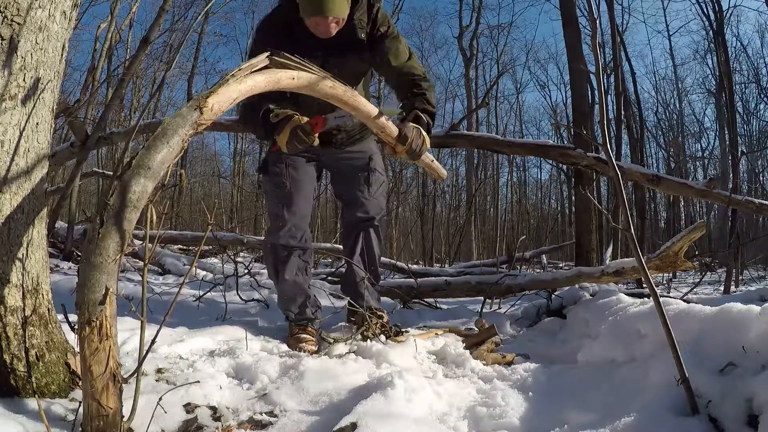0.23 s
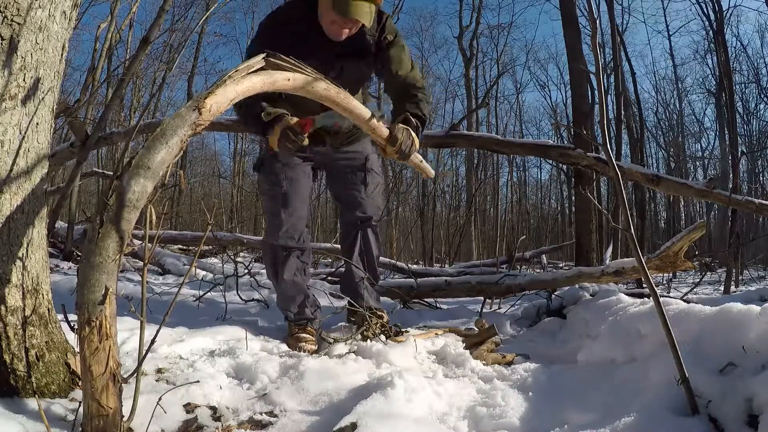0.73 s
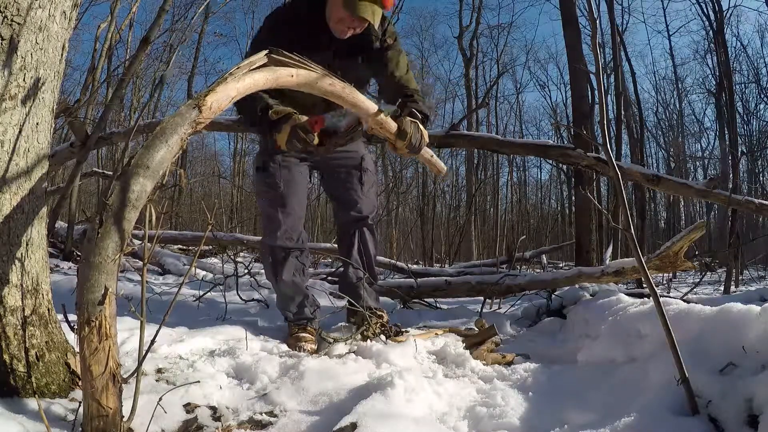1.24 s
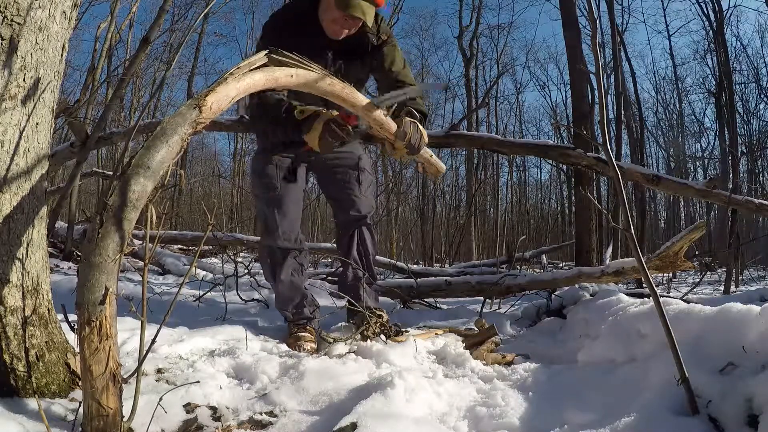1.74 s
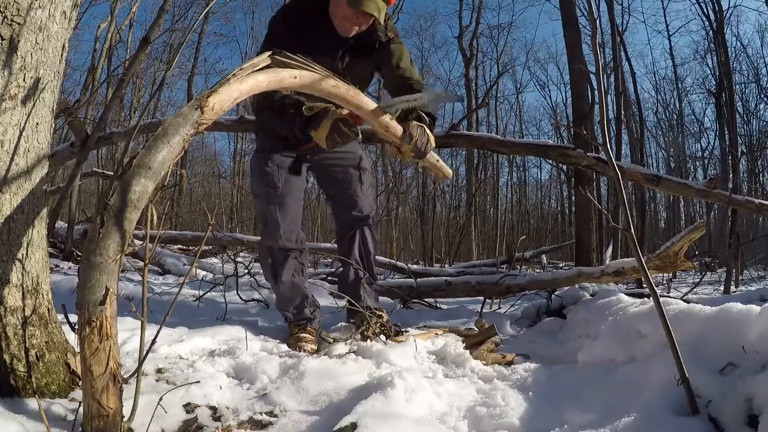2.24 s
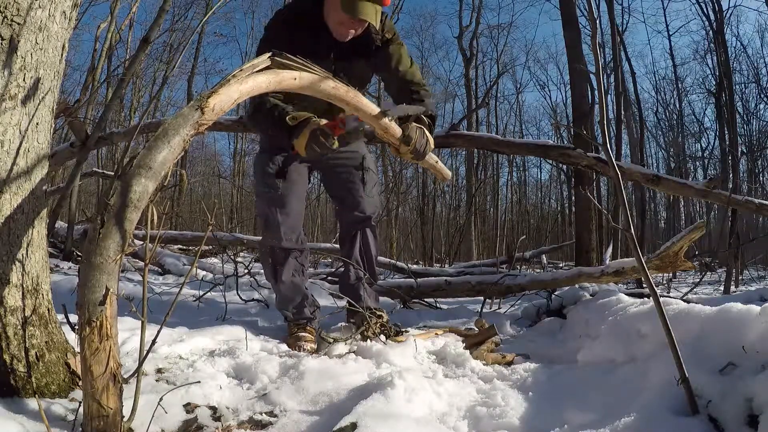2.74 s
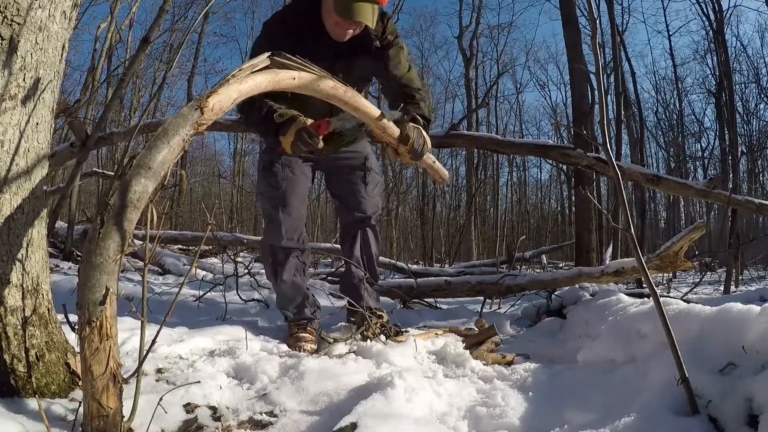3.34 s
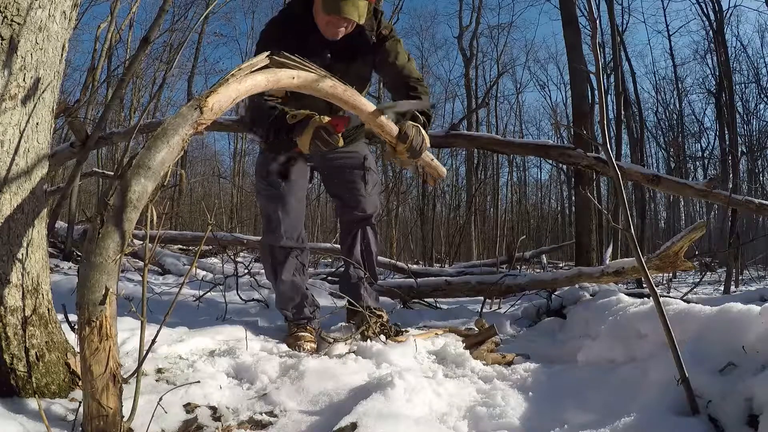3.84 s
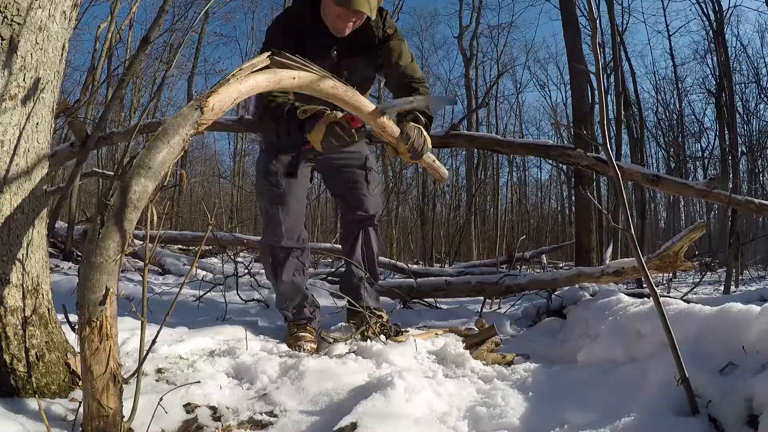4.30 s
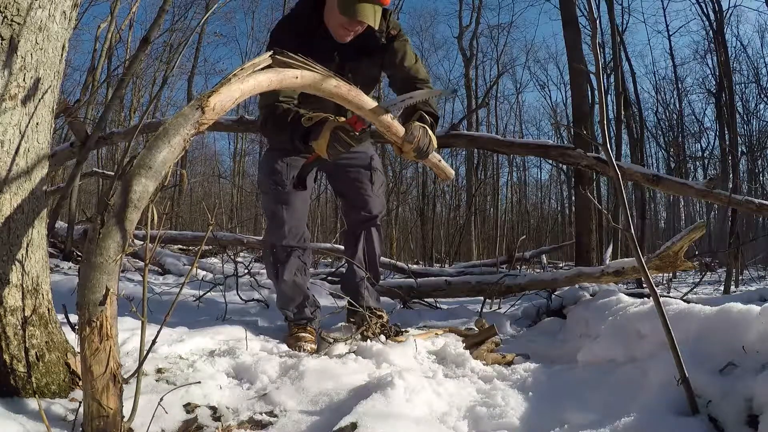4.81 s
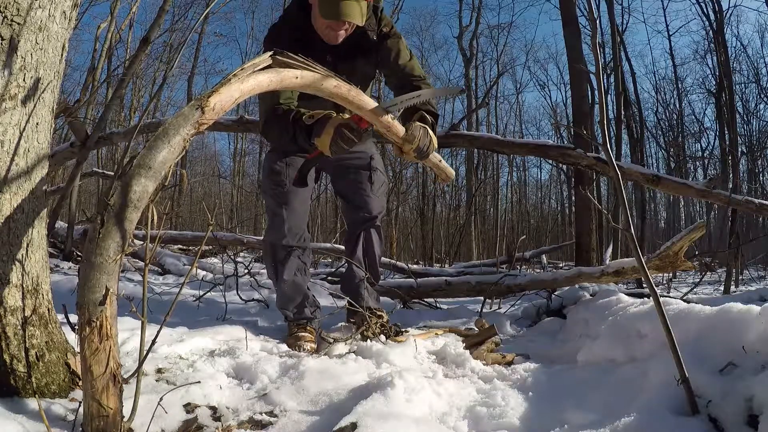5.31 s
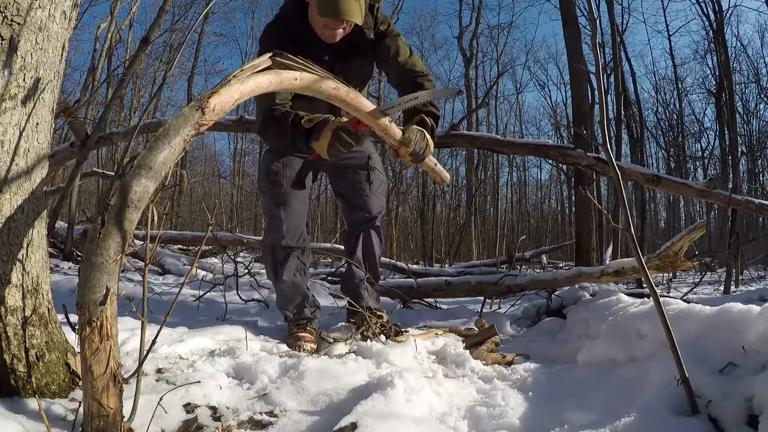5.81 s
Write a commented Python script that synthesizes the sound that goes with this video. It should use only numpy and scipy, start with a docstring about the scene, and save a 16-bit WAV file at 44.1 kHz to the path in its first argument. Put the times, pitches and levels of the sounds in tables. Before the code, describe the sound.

A hand saw cuts a dead branch throughout the six seconds, in quick, even strokes, a little over two back-and-forth cycles a second. Each pull is a dry, biting rasp that makes the branch judder; each push is lighter and duller, with a slight growl. Teeth snag with sharp clicks, strongest near 0.6, 1.5, 2.3, 3.6 and 4 seconds. The branch knocks dully around 1.9, 3.6, 4.5 and 5 seconds. The blade pings briefly near 1.9 and 2.3 seconds, and thin, short squeaks come now and then, mostly between 5 and 6 seconds. Several tiny digital glitches freeze the rasp into held tones for an instant, for example near 0.4, 2.1 and 4.5 seconds. The surrounding woods are quiet, with a faint steady hush and a thin echo from the trunks. Light air rumbles on the microphone, easing after about 5 seconds.

```python
"""A pruning saw rasps through a dead branch in quick, even strokes, in quiet winter woods.
On each pull the teeth bite and the branch judders; on each push they skate back, duller and lighter.
Teeth snag and tear free, the branch knocks, and now and then the blade squeaks or pings.
Brief digital glitches freeze the rasp into a few held tones.
Behind it, tree trunks give a faint echo and light air rumbles on the microphone."""
import sys
import numpy as np
from scipy import signal
from scipy.fft import rfft, irfft, next_fast_len
from scipy.io import wavfile
from scipy.ndimage import uniform_filter1d, map_coordinates

SR = 44100
rng = np.random.default_rng(int(sys.argv[2]) if len(sys.argv) > 2 else 0)


def transcribe(signal):
    """Save signal, clipped to [-1, 1], as a 16-bit WAV file at the path in sys.argv[1]."""
    frames = np.atleast_2d(signal).T
    limited = np.clip(frames, -1, 1)
    pcm = np.round(limited * 32767).astype(np.int16)
    wavfile.write(sys.argv[1], SR, pcm)


N = 267246

# A stroke has four parts: the teeth bite, the blade scrapes, the fibres hiss, the branch knocks.
# One row a push: start_s, length_s, hardest_moment (0-1), bite_db, scrape_db, hiss_db, knock_db,
# landing_db (extra pressure as the teeth land). Scrape, hiss and knock are added to bite_db.
PUSH_STROKES = [(-0.098, 0.1561, 0.33, -29.5, 1.5, -5, -10.5, 3.0),
                (0.325, 0.1829, 0.59, -33.5, -4.5, -7.5, -9, 8),
                (0.758, 0.16, 0.63, -31.5, -4, -8.0, -8.5, 11),
                (1.176, 0.16, 0.618, -31.0, -5.5, -9.5, -10, 11.5),
                (1.583, 0.17, 0.62, -33.5, -3.5, -5, -5.5, 8.5),
                (2.027, 0.13, 0.63, -31.5, -7.5, -8.0, -6.5, -1),
                (2.425, 0.17, 0.62, -33.0, -5.5, -7, -12, 5.5),
                (2.858, 0.15, 0.648, -32.5, -4.5, -6.0, -11, 4),
                (3.301, 0.17, 0.41, -33.5, -4, -6.5, -8.5, -8),
                (3.724, 0.17, 0.58, -33.5, -2.5, -6, -10, 9.5),
                (4.172, 0.16, 0.4926, -33, -3.5, -6, -16, -3),
                (4.605, 0.21, 0.59, -35.5, -3.5, -7.5, -8.5, 8),
                (5.103, 0.19, 0.393, -35, -2.5, -5.5, -9.5, -6.5),
                (5.545, 0.19, 0.6055, -34, -1, -4.5, -7.5, 7),
                (5.988, 0.1644, 0.653, -34.5, -1, -1.5, -5.5, 6.5)]
# One row a pull: the same columns, then judder_depth (0-1), judder_hz
PULL_STROKES = [(0.092, 0.1902, 0.5475, -28.5, -4, -7, -12, 0, 0.76, 77.66),
                (0.534, 0.17, 0.43, -28.0, -3.5, -4.0, -9.5, -6.5, 0.5, 78.0),
                (0.974, 0.17, 0.462, -27, -3.5, -3.5, -13.0, -13.5, 0.43, 74.8),
                (1.398, 0.14864, 0.435, -26.5, -5.5, -5, -11.5, -7.5, 0.25, 76.4),
                (1.776, 0.17, 0.674, -33.5, -0.5, -4.5, -8.0, 5.5, 0.75, 65.4),
                (2.216, 0.1673, 0.55, -26.5, -4.0, -5.5, -12, -7.5, 0.38, 76.44),
                (2.64, 0.16, 0.65, -30.5, -4.5, -5, -11.0, 5.5, 0.75, 74.8),
                (3.082, 0.1641, 0.59, -31.5, -1.5, -4.5, -9, 2.5, 0.68, 77.3),
                (3.504, 0.1694, 0.54, -29.0, -5.5, -3.5, -10, -4.5, 0.891, 69.9),
                (3.924, 0.1656, 0.7052, -30.5, -1.5, -2.5, -10, 9, 0.91, 74.2),
                (4.375, 0.16, 0.62, -31, -2.5, -3, -9.5, 0.5, 0.55, 78.0),
                (4.879, 0.15, 0.48, -29.5, -7, -4.5, -10, -5.5, 0.44, 75.6),
                (5.332, 0.18, 0.54, -31, -2.5, -2, -8.5, -3.5, 0.19, 79.1),
                (5.784, 0.16, 0.5236, -29, -4.5, -1, -9.5, -3.5, 0.31, 76.7)]
def sawing():
    """The saw goes back and forth; a caught tooth stalls the blade just before it tears free."""
    out, stall_db = np.zeros((2, N))
    for start_s, *shape, depth, judder_hz in PULL_STROKES:
        add(out, start_s, pull(shape, depth, judder_hz))
    for start_s, *shape in PUSH_STROKES:
        add(out, start_s, push(shape))
    for snag_s, _ in TOOTH_SNAGS:
        add(stall_db, snag_s - .008, 5 * np.hanning(440))
    return out * amp(-stall_db)


# How each part follows the arm's effort. Rows are bite, scrape, hiss, knock:
# steepness (a power of effort), lag (share of the stroke), landing_share (of landing_db)
PULL_RESPONSE = [(1.24, 0., 0.973), (1.36, 0.0019, 0.645), (1.73, -.01, 1), (0.71, .06, 1)]
# The tone of each part of a pull: pitch_hz, level_db
PULL_BITE_TONE = [(650, -77), (1100, -18), (1300, -6), (1410, 0.5), (1450, 1.5), (1740, -7.5),
                  (1870, -10.5), (2300, -19), (2990, -49), (5060, -120)]
PULL_SCRAPE_TONE = [(1350, -23.5), (2300, -9.5), (2450, -12.5), (2660, 1.5), (2820, 1), (3340, -2),
                    (3690, -8.5), (4010, -8), (4340, -9), (5360, -9), (5950, -20), (6200, -17.5),
                    (8060, -28), (13600, -120)]
PULL_HISS_TONE = [(3650, -34.5), (6200, -11), (8140, 0.5), (8590, -3.5), (9640, -13.5), (12900, -9),
                  (15500, -18.5)]
PULL_KNOCK_TONE = [(88, -12), (150, -23.5), (189, 0), (273, 0), (334, -1.5), (382, -19), (436, -5.5),
                   (533, -10), (822, -0.5), (1100, -7.5), (1430, -20), (2420, -120)]
def pull(shape, depth, judder_hz):
    """The cutting stroke: the branch bounces on the teeth, so they bite in bursts and it thrums."""
    speed, bite, scrape, hiss, knock = stroke(PULL_RESPONSE, *shape, land_at=.2134, land_spread=.24)
    force = teeth(speed, tooth_hz=680, jitter=.25, uneven_db=2.5, tear_s=.0008, rub=1., click=.5)
    steel = shifting_grip(force, depth_db=2.5, patch_hz=200.2, patch_s=.01445)
    swing = 2 * np.pi * np.cumsum(judder_hz * (1 + .06 * wobble(len(speed), 40))) / SR
    pressure = depth * np.cos(swing)
    cut = amp(-1.35) * bite * colour(force * amp(3.7 * pressure), PULL_BITE_TONE)
    blade = amp(-1.5) * scrape * colour(steel * amp(2.5 * pressure), PULL_SCRAPE_TONE)
    fibres = amp(.4) * hiss * colour(steel * amp(3.2 * pressure), PULL_HISS_TONE)
    branch = amp(-2.5) * knock * colour(force * amp(2 * pressure), PULL_KNOCK_TONE)
    sway = resonate(np.sin(swing), hz=80, width_hz=18)  # the branch's slowest sway
    thrum = amp(2) * depth * uniform_filter1d(knock, 900) * sway
    return cut + blade + fibres + branch + thrum


# Bite, scrape, hiss and knock on a push: steepness, lag, landing_share
PUSH_RESPONSE = [(1.14, 0.0158, 0.91), (1.67, -.02, 0.5), (1.52, -.04, .6), (0.64, .08, 1)]
# The tone of each part of a push, and of its growl: pitch_hz, level_db
PUSH_BITE_TONE = [(650, -24.5), (1100, -13), (1210, -2.5), (1450, 3), (1520, 2.5), (1630, -8.5),
                  (1930, -5.5), (2300, -19.5), (2990, -33.5), (5060, -120)]
PUSH_SCRAPE_TONE = [(1350, -38.5), (2300, -9), (2530, -14), (2830, 0.5), (3080, -10.5), (3340, -5.5),
                    (3830, -14), (4160, -9.5), (6200, -17), (8060, -25), (13600, -120)]
PUSH_HISS_TONE = [(3650, -29.5), (6200, -29.5), (6930, -4), (8270, 1), (9600, -12.5), (12900, -7.5),
                  (15500, -21.5)]
PUSH_KNOCK_TONE = [(90, -44), (135, -28), (172, 0), (235, -11.5), (335, 1.5), (410, 6), (500, -5.5),
                   (630, 4), (780, 2), (900, -8.5), (1100, -5.5), (1430, -48), (2400, -100)]
GROWL_TONE = [(90, -5.5), (170, 0), (250, 0.5), (350, 4), (480, -4.5), (680, 0.5), (900, -7.5), (1400, -22),
              (2400, -70)]
def push(shape, full_speed_bump_hz=190.25):
    """The return stroke: the backs of the teeth bump along in a growl that falls as the blade slows."""
    speed, bite, scrape, hiss, knock = stroke(PUSH_RESPONSE, *shape, land_at=.19, land_spread=.09)
    force = teeth(speed, tooth_hz=617, jitter=.3, uneven_db=2.5, tear_s=.0014, rub=.99, click=.5)
    steel = shifting_grip(force, depth_db=3, patch_hz=214, patch_s=.01756)
    cycles = np.cumsum(full_speed_bump_hz * speed * (1 + .025 * wobble(len(speed), 150))) / SR
    # the long branch passes each overtone of the bumps with its own strength and delay
    bumps = evened(sum(rng.uniform(.55, 1) * np.cos(2 * np.pi * (k * cycles + rng.random()))
                       for k in range(1, 12)))
    cut = amp(-.5) * bite * colour(force + .061 * bumps, PUSH_BITE_TONE)
    blade = amp(-.5) * scrape * colour(steel, PUSH_SCRAPE_TONE)
    fibres = amp(-1) * hiss * colour(force + .5 * steel, PUSH_HISS_TONE)
    swell = arch(np.linspace(0, 1, len(speed)), top=.74) ** 1.5
    growl = amp(1.5) * knock * swell * colour(bumps, GROWL_TONE)
    branch = amp(-6) * knock * colour(force, PUSH_KNOCK_TONE)
    sway = amp(-15) * knock * evened(resonate(force, hz=100, width_hz=25))
    return cut + blade + fibres + growl + branch + sway


def stroke(response, length_s, hardest, bite_db, scrape_db, hiss_db, knock_db, landing_db,
           land_at, land_spread):
    """One sweep of the arm: gives the blade's speed and the loudness of the four parts over time."""
    progress = np.linspace(0, 1, int(length_s * SR))
    top_speed = min(.16 / length_s, 1)  # only brisk strokes reach full speed
    speed = top_speed * (.5 + .5 * arch(progress, top=.58))
    pressure_db = landing_db * np.exp(-((progress - land_at) / land_spread) ** 2)
    level_db = bite_db + 2 * wobble(len(progress), 54.55)  # uneven wood makes the rasp waver
    gains = [amp(level_db + part_db + share * pressure_db) * arch(progress, hardest + lag) ** steepness
             for part_db, (steepness, lag, share) in zip((0, scrape_db, hiss_db, knock_db), response)]
    return speed, *gains


def teeth(speed, tooth_hz, jitter, uneven_db, tear_s, rub, click):
    """Each tooth snaps through fibres: a click and a short tearing burst, over steady rubbing."""
    count = len(speed)
    teeth_passed = np.cumsum(tooth_hz * speed * np.exp(jitter * wobble(count, 400))) / SR
    strength = amp(uneven_db * np.clip(rng.standard_normal(count), -2, 2))
    blows = strength * np.diff(np.floor(teeth_passed), prepend=0)
    tearing = evened(signal.lfilter([1], [1, -np.exp(-1 / (tear_s * SR))], blows))
    return evened((rub + tearing) * rng.standard_normal(count) + click * evened(blows))


def shifting_grip(force, depth_db, patch_hz, patch_s):
    """The grip on the blade keeps shifting, so narrow bands of pitch swell and fade."""
    hz, t, spectrum = signal.stft(force, SR, nperseg=512, noverlap=384)
    grid = np.meshgrid(hz / patch_hz, t / patch_s, indexing="ij")
    patches = evened(map_coordinates(rng.standard_normal((256, 64)), grid, order=1, mode="mirror"))
    gain = amp(depth_db * np.clip(patches, -2, 2))
    _, steel = signal.istft(spectrum * gain, SR, nperseg=512, noverlap=384)
    return evened(steel[:len(force)])


# Teeth catching on hard fibres: start_s, peak_db
TOOTH_SNAGS = [(.191, -17), (.204, -26.5), (.353, -32), (.55, -35), (.64, -13), (0.792, -32), (.859, -34.5),
               (1.195, -29), (1.464, -14.5), (1.487, -21), (1.612, -34), (1.833, -29), (1.864, -23),
               (1.878, -28), (1.895, -25), (2.083, -21), (2.275, -20), (2.32, -16.5), (2.7, -22),
               (2.889, -32.5), (3.139, -24), (3.538, -26), (3.568, -18), (3.585, -16.5), (3.598, -28.5),
               (3.636, -22), (3.976, -24.5), (4.002, -17), (4.643, -35), (4.915, -36), (4.956, -24),
               (5.82, -29)]
# The blade ticking in its slot as a stroke turns: start_s, peak_db
SLOT_TICKS = [(0.297, -44.5), (1.34, -67), (2.199, -45)]
# The notes of the wood at the cut: pitch_hz, width_hz, level_db
WOOD_NOTES = [(1502.3, 98, 10), (1647, 76, 2.5), (2910, 495, -3), (3920, 440, -33), (8550, 710, -22)]
def snags_and_ticks():
    """A caught tooth tears free and rings the wood; at the turns the blade only ticks."""
    out, t = np.zeros(N), np.arange(1200) / SR
    for start_s, peak_db in TOOTH_SNAGS:
        tear = burst(t, fade_s=.00159)
        snag = ring(tear, WOOD_NOTES) + .18 * colour(tear, PULL_HISS_TONE)
        add(out, start_s, amp(peak_db) * snag / abs(snag).max())
    for start_s, peak_db in SLOT_TICKS:
        tap = burst(t, fade_s=.00086)
        tick = colour(tap, PULL_HISS_TONE) + .58 * ring(tap, WOOD_NOTES)
        add(out, start_s, amp(peak_db) * tick / abs(tick).max())
    return out


# The branch jolting under a hard pull: start_s, peak_db
BRANCH_JOLTS = [(1.484, -40), (1.899, -31.5), (3.6, -34), (4.478, -32), (4.97, -32.5)]
# The low notes of the whole branch: pitch_hz, width_hz, level_db
BRANCH_NOTES = [(107.7, 17, -6.5), (189.3, 54, -3), (257, 38, -2.5)]
def jolts():
    """The whole branch gives a dull knock when the saw grabs it."""
    out, t = np.zeros(N), np.arange(SR // 6) / SR
    for start_s, peak_db in BRANCH_JOLTS:
        knock = ring(burst(t, fade_s=.001), BRANCH_NOTES)
        add(out, start_s, amp(peak_db) * knock / abs(knock).max())
    return out


# Sliding squeaks: start_s, length_s, start_hz, end_hz, level_db
TOOTH_SQUEAKS = [(1.643, 0.035, 4170, 3780, -42), (2.297, 0.059, 3970, 4130, -36),
                 (2.493, 0.03, 4350, 4000, -41.5), (2.756, 0.025, 3276, 3440, -41),
                 (3.195, .03, 4100, 4380, -48.5), (4.668, 0.056, 5990, 5800, -44),
                 (5.163, 0.026, 5700, 4670, -40), (5.152, 0.082, 3680, 3140, -36.5),
                 (5.404, .055, 7440, 8156, -29.5), (5.627, 0.048, 4745, 4100, -32.5),
                 (5.846, 0.0596, 8200, 7560, -33)]
def squeaks():
    """Steel teeth skate on the wood with a thin squeak that slides up or down."""
    out = np.zeros(N)
    for start_s, length_s, start_hz, end_hz, level_db in TOOTH_SQUEAKS:
        hz = np.linspace(start_hz, end_hz, int(length_s * SR))
        rubbing = rng.standard_normal(len(hz))
        squeak = resonate(resonate(rubbing, hz, width_hz=290), hz, width_hz=290)
        add(out, start_s, amp(level_db) * evened(squeak) * signal.windows.tukey(len(hz), .7))
    return out


# Pings late in a pull: start_s, pitch_hz, level_db, ring_s (time to fade by 60 dB)
BLADE_PINGS = [(.69, 3370, -56, 0.126), (1.931, 3922, -26, 0.041), (1.933, 7690, -27, .035),
               (2.324, 3227, -25, 0.071), (4.075, 2012, -41.5, 0.11)]
def pings():
    """The blade rings freely on one pure note that quickly dies away."""
    out, t = np.zeros(N), np.arange(SR // 6) / SR
    onset = 1 - np.exp(-t / .001)
    for start_s, pitch_hz, level_db, ring_s in BLADE_PINGS:
        add(out, start_s, amp(level_db - 60 * t / ring_s) * onset * np.sin(2 * np.pi * pitch_hz * t))
    return out


# Brief digital glitches: middle_s, length_s, level_db (compared with the rasp)
DIGITAL_GLITCHES = [(0.396, 0.037, -1), (1.673, 0.0305, -3), (2.1, 0.034, -2.5), (2.953, 0.0332, -2),
                    (3.589, 0.031, -2.5), (4.441, 0.033, -1.5), (4.488, 0.027, 1), (5.437, 0.029, 0.5)]
def glitches(rasp, tone_count=36):
    """A digital glitch freezes the strongest pitches into held tones while the hiss between drops."""
    out = rasp.copy()
    for middle_s, length_s, level_db in DIGITAL_GLITCHES:
        start_s = middle_s - length_s / 2
        t = np.arange(int(length_s * SR)) / SR
        part = rasp[round(start_s * SR):][:len(t)]
        hz = np.fft.rfftfreq(len(t), 1 / SR)
        strength = abs(rfft(part * np.hanning(len(t))))
        peaks = signal.find_peaks(strength, distance=5)[0]
        held = peaks[np.argsort(-strength[peaks] * hz[peaks] ** .25)[:tone_count]]  # favour high ones
        tones = strength[held] @ np.cos(2 * np.pi * (hz[held, None] * t + rng.random((tone_count, 1))))
        blend = signal.windows.tukey(len(t), .5) * np.pi / 2
        tones_in = amp(level_db) * part.std() * evened(tones) * np.sin(blend)
        rasp_out = .7 * part * (1 - np.cos(blend))
        add(out, start_s, tones_in - rasp_out)
    return out


def tree_echo(sound, fade_s=.207, echoes_per_s=1500):
    """Trunks scatter back a thin, dull echo; the snow swallows the rest."""
    t = np.arange(SR // 2) / SR
    echoes = rng.standard_normal(len(t)) * (rng.random(len(t)) < echoes_per_s / SR)
    fade = (t > .012) * amp(-60 * t / fade_s)
    tail = colour(echoes * fade, [(100, 25.5), (1000, -12), (4000, -2), (14000, -13)])
    return signal.fftconvolve(sound, tail / np.linalg.norm(tail))[:N]


# The tone of the still woods and of air on the microphone: pitch_hz, level_db
HUSH_TONE = [(40, -50), (100, -5), (200, -19), (420, -18.5), (800, -16), (1400, -20), (2500, -24),
             (8000, -30.5), (15500, -40)]
RUMBLE_TONE = [(2, 22), (6, 21), (14, 3.5), (25, -14), (50, -10), (100, -26), (250, -49), (600, -86)]
# The breeze rising and falling: time_s, level_db
GUSTS = [(0.0, -40.5), (0.9, -38.5), (1.3, -43.5), (2.4, -43.5), (3.6, -39.5), (4.6, -35), (5.1, -50),
         (5.449, -47), (6.06, -51.5)]
def air():
    """The woods give a steady hush, and slow gusts rumble on the microphone."""
    hush = amp(-59) * colour(rng.standard_normal(N), HUSH_TONE)
    gusts = amp(np.interp(np.arange(N) / SR, *np.transpose(GUSTS)))
    return hush + gusts * colour(rng.standard_normal(N), RUMBLE_TONE)


def amp(db):
    """Turns decibels into a number to multiply by."""
    return 10 ** (np.asarray(db) / 20)


def evened(x):
    """Scales x to an average strength (rms) of 1."""
    return x / np.sqrt(np.mean(x ** 2) + 1e-20)


def add(mix, start_s, sound):
    """Mixes a sound in at start_s; anything before time zero is cut off."""
    at = round(start_s * SR)
    sound = sound[max(-at, 0):]
    part = mix[max(at, 0):][:len(sound)]
    part += sound[:len(part)]


def colour(x, tone):
    """Shapes the lows and highs of x along (pitch_hz, level_db) points, then evens it to strength 1."""
    size = next_fast_len(len(x) + 4096)
    hz, db = np.transpose(tone)
    gain = amp(np.interp(np.log(np.fft.rfftfreq(size, 1 / SR) + 1), np.log(hz + 1), db))
    return evened(irfft(rfft(x, size) * gain, size)[:len(x)])


def resonate(x, hz, width_hz):
    """Lets through a narrow band of x around one pitch, which may slide."""
    turn = np.exp(2j * np.pi * np.cumsum(hz * np.ones(len(x))) / SR)
    decay = np.exp(-np.pi * width_hz / SR)
    return 2 * (turn * signal.lfilter([1 - decay], [1, -decay], x / turn)).real


def ring(x, notes):
    """x shakes an object, which rings at each of its own notes."""
    return sum(amp(db) * evened(resonate(resonate(x, hz, width), hz, 5 * width))
               for hz, width, db in notes)


def burst(t, fade_s):
    """A puff of noise that starts at once and dies away."""
    return rng.standard_normal(len(t)) * np.exp(-t / fade_s)


def wobble(count, hz):
    """A random drift of about size 1 that changes course hz times a second."""
    points = rng.standard_normal(512)
    return np.interp(np.arange(count) * hz / SR, np.arange(len(points)), points)


def arch(progress, top):
    """Effort over a stroke (progress from 0 to 1): it rises to 1 at top and falls back to 0."""
    lean = np.log(.5) / np.log(np.clip(top, .2, .85))
    return np.maximum(np.sin(np.pi * progress ** lean), 0)


def scene():
    """The saw among the trees, in one channel."""
    saw = glitches(sawing()) + snags_and_ticks() + jolts() + squeaks() + pings()
    return (saw + amp(-24) * tree_echo(saw) + air())[None]


def record(dry, ceiling=.3, cutoff_hz=15600):
    """Softly rounds the loudest peaks, then removes the very highest treble."""
    rounded = ceiling * np.tanh(dry / ceiling)
    treble_cut = signal.firwin(511, cutoff_hz, window=("kaiser", 9), fs=SR)
    return signal.oaconvolve(rounded, treble_cut[None], "same")


dry = scene()
out = record(dry)
transcribe(out)
```